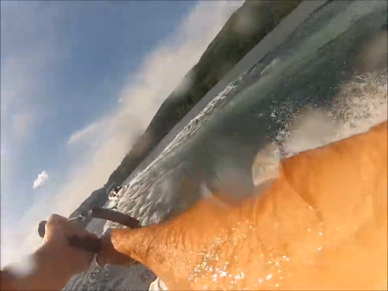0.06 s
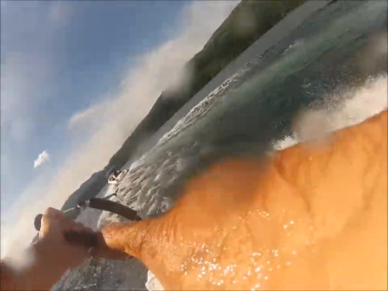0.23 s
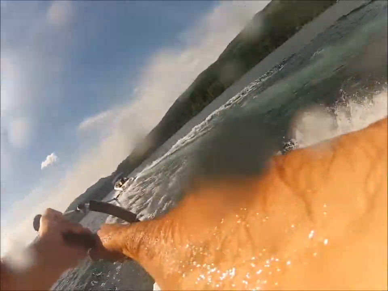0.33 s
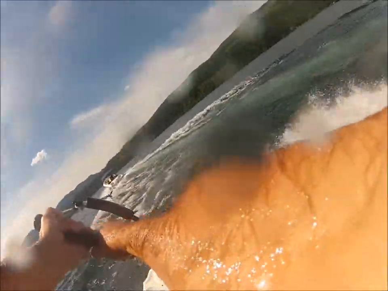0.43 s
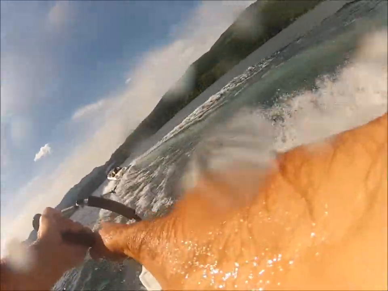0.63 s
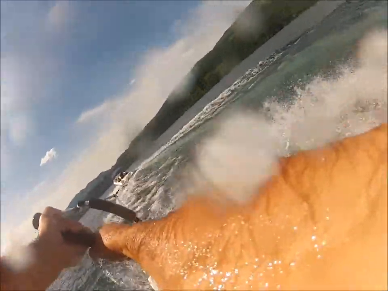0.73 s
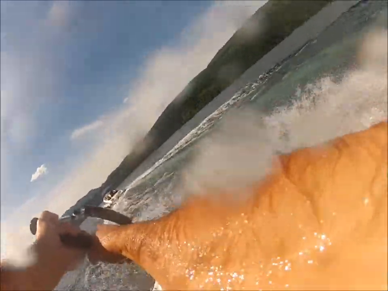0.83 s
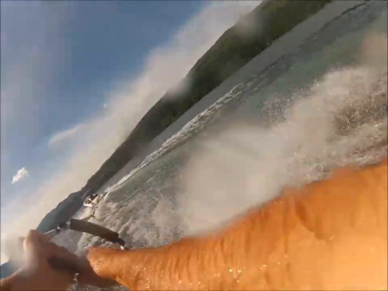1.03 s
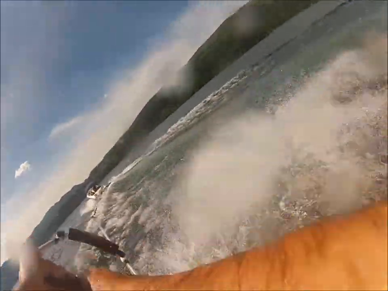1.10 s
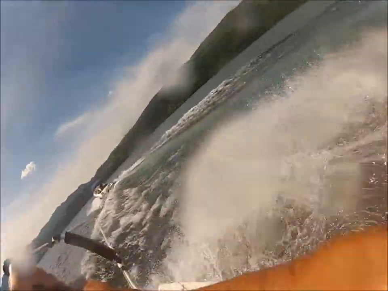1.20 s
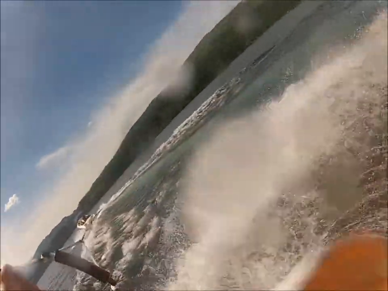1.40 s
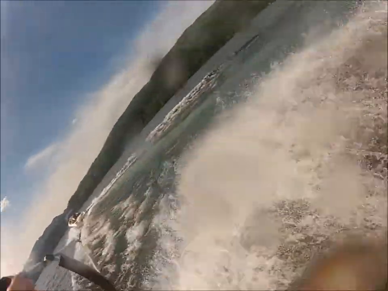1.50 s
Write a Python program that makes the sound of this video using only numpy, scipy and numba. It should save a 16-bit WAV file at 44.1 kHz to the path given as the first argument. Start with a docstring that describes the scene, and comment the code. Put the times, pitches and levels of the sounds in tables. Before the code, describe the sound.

Water slapping sharply on a waterproof camera, with rushing spray, wind and a towing boat's engine.

```python
"""A tow boat's drone, a hissing wake and buffeting wind, broken by sharp cracks and thumps of water.
A wakeboarder crosses a lake, heard from a camera in a waterproof case on the rider. Exhaust pulses
make the drone; drops set the case ringing, slaps push on the microphone, spray and gurgles wash over it.
The camera ducks after loud hits, overloads, and holds its samples at a low rate,
which mirrors the sound into a gritty treble."""
import sys
import numpy as np
from scipy import signal
from scipy.fft import rfft, irfft
from scipy.io import wavfile
from scipy.ndimage import uniform_filter1d, map_coordinates
from numba import njit

SR = 44100
rng = np.random.default_rng(int(sys.argv[2]) if len(sys.argv) > 2 else 0)


def store_wav(level_fs):
    """Save 16-bit WAV to argv[1]."""
    pcm = np.round(np.clip(np.atleast_2d(level_fs), -1, 1) * 32767)
    wavfile.write(sys.argv[1], SR, pcm.T.astype(np.int16))


N = 68355


def drops():
    """Impact excitation: each drop drives two case modes and a splatter, which decay after contact."""
    # impacts: t/s, level/dB, contact/s, main mode f/Hz, lower mode f/Hz,
    # then relative level/dB of the lower mode, the splatter and the knock
    impacts = [(0.046, -37, 0.0031, 3360, 2400, -9, -1, -22),
               (.2336, -11, 0.00098, 1010, 810, -11, -6.5, -11),
               (0.24, -9.5, 0.00095, 2470, 1970, -8, 0.5, 3.5),
               (0.392, -27.5, 0.0017, 950, 650, 0, -19, -8),
               (.4317, -4.5, 0.0011, 2094, 1182, -8, -6.5, -20),
               (0.996, -37.5, 0.0072, 2450, 1123, 3, 4.5, -17),
               (1.0225, -2.5, 0.0024, 2489, 1950, -11, -10, -13),
               (1.0805, -15.5, 0.00053, 2250, 1480, -2, -6, -11),
               (1.2268, -2.5, 0.0041, 2360, 1627, -4, -8.5, -8), (1.287, -33, 0.0024, 1680, 950, 0, -21, 0),
               (1.301, -24, 0.00046, 1900, 1530, -14, -17, -19),
               (1.526, -27, 0.0019, 2240, 1455, 1, -0.5, -2)]
    # spectrum of a large drop splattering on the case: f/Hz, level/dB
    splatter_spectrum = [(100, 9.5), (300, 3), (600, -16), (900, 11.5), (1120, 4), (1300, -28), (1550, 6.5),
                         (1900, 4), (2450, 8.5), (2850, 0), (3150, -19), (3550, 15), (3900, -17)]
    attack_s, decay_s, tail_s, tail_share = 0.00017, 0.00075, 0.0024, undb(-5.5)
    knock_s, push_s = 0.00039, 0.0015
    out = np.zeros(N)
    for at, db, contact, main_hz, low_hz, low_db, splatter_db, knock_db in impacts:
        age = seconds() - at
        after = np.maximum(age - contact, 0)
        decay = (1 - tail_share) * np.exp(-after / decay_s) + tail_share * np.exp(-after / tail_s)
        envelope = np.clip(age / attack_s, 0, 1) * decay
        wobble = 1 + 0.13 * walk(2500)  # frequency modulation broadens the modes into a rattle
        phase_per_hz = 2 * np.pi * np.cumsum((age > 0) * wobble) / SR
        modes = np.sin(main_hz * phase_per_hz) + undb(low_db) * np.sin(low_hz * phase_per_hz)
        splatter = colour(rng.standard_normal(N), splatter_spectrum)
        crack = undb(-2) * burst(modes, envelope) + undb(splatter_db) * burst(splatter, envelope)
        knock = undb(knock_db) * bump(at + contact, knock_s)
        push = undb(-15.5) * bump(at + contact + 2 * push_s, push_s)
        out += undb(db) * (crack - knock + push)
    return out


def slaps():
    """Damped oscillator: water sucks, then pushes on the microphone, which swings back slowly."""
    # driving pulses: t/s, level/dB, half width/s, ratio of suction to push
    pulses = [(0.2397, 4, 0.0052, 1.155), (0.271, -5.5, 0.0016, 0), (0.3936, -11, 0.0012, 0.14),
              (.9988, -23, 0.0013, 0.045), (1.007, -21.5, 0.0021, 1.4), (1.089, -25, .0016, 0)]
    suction_lead_s, suction_s = 0.00488, 0.0014
    swing_hz, swing_q = 33.7, 1.1
    pressure = np.zeros(N)
    for at, db, width, suction in pulses:
        pressure += undb(db) * (bump(at, width) - suction * bump(at - suction_lead_s, suction_s))
    omega = 2 * np.pi * swing_hz
    resonant_highpass = signal.bilinear([1, 0, 0], [1, omega / swing_q, omega ** 2], SR)
    return signal.lfilter(*resonant_highpass, pressure)


def wind(gust_db=1.8, gusts_per_s=18):
    """Turbulence: low pressure noise buffets the case in quick gusts."""
    # spectral density: f/Hz, level/dB
    spectrum = [(15, 7.5), (35, 2.5), (70, 1), (120, -3), (175, -2.5), (260, -9), (420, -13), (620, -26.5),
                (1200, -59)]
    # wind strength: t/s, level/dB
    level = [(0, -36.5), (.07, -36), (.17, -40), (.35, -38), (.6, -39.5), (.75, -37.5), (.9, -36.5),
             (1.1, -35), (1.17, -32.5), (1.3, -39), (1.43, -33.5), (1.55, -33.5)]
    return colour(rng.standard_normal(N), spectrum) * undb(curve(level) + gust_db * walk(gusts_per_s))


def engine(jitter_s=0.00007, scatter_db=1.35):
    """Source and filter: the tow boat's uneven exhaust pulses, dulled by distance and water."""
    # firing rate: t/s, f/Hz
    firing_rate = [(0, 100.2), (.3, 99.6), (.8, 100), (1.17, 98.3), (1.35, 98.8), (1.55, 102)]
    # the four pulses of an engine cycle: relative level/dB
    cylinders = [10, 9.5, 5, 2.5]
    # exhaust response: f/Hz, level/dB
    exhaust = [(40, -2), (100, -3), (200, 1), (300, 0), (400, -5), (470, 3), (520, -34), (600, -38),
               (900, -49), (1500, -66)]
    # drone strength: t/s, level/dB
    level = [(0, -40), (.7, -38), (1.15, -41), (1.55, -43)]
    pulse_count = np.floor(np.cumsum(curve(firing_rate)) / SR + 1 / 4)
    fired = np.flatnonzero(np.diff(pulse_count) > 0)
    late, size = rng.standard_normal((N // 100, 2))[:len(fired)].T
    onsets = np.clip(fired + (late * jitter_s * SR).astype(int), 0, N - 1)
    pulses = np.zeros(N)
    pulses[onsets] = undb(np.resize(cylinders, len(fired)) + scatter_db * size)
    return colour(pulses - pulses.mean(), exhaust) * undb(curve(level))


def wake(flicker_db=0.28):
    """Resonant transmission: the noise of rushing water is coloured by the modes of the case."""
    # spectral density inside the case: f/Hz, level/dB
    spectrum = [(320, -49), (550, -11), (587, -15), (606, -44), (673, -22), (712, -8.5), (760, -8.5),
                (851, -4.5), (923, -6), (1020, -0.5), (1140, 1.5), (1410, -9.5), (1730, -4), (1930, -7.5),
                (2500, 1), (2730, -21.5), (3290, -5.5), (3530, -7.5), (3800, -7.5), (4940, -44),
                (8360, -120)]
    # hiss strength: t/s, level/dB
    level = [(0, -44.5), (.04, -41), (.16, -41.5), (.3, -40.5), (.55, -45), (.65, -43), (.77, -44),
             (1, -41.5), (1.55, -43)]
    return colour(rng.standard_normal(N), spectrum) * undb(curve(level) + flicker_db * walk(45.08))


def spray(droplets_per_s=1700, scatter_db=7):
    """Shot noise: tiny droplets strike the case, louder as the board throws up a sheet of water."""
    # response of the case to fine spray: f/Hz, level/dB
    case_response = [(150, -14), (600, -12), (880, -3), (1200, -20), (1550, -2.5), (2000, -6), (2450, -0.5),
                     (2900, -5.5), (3200, -14), (3550, 2.5), (3900, -44)]
    # spray reaching the case: t/s, level/dB
    level = [(0, -62), (.6, -45.5), (.95, -56), (1.1, -54), (1.35, -48.5), (1.47, -47.5), (1.52, -40),
             (1.55, -39.5)]
    arrivals = rng.random(N) < droplets_per_s / SR
    hits = arrivals * rng.choice([-1, 1], N) * undb(scatter_db * rng.standard_normal(N))
    return colour(hits, case_response) * undb(curve(level))


def gurgles(centre_hz=860, width_hz=87, rise_s=0.0048):
    """Narrow-band resonance: short hollow swells of noise as water runs over the case."""
    # swells: t/s, level/dB
    swells = [(0.263, -36), (0.821, -40), (1.096, -37), (1.128, -42), (1.246, -37.5), (1.282, -37)]
    resonance = signal.iirpeak(centre_hz, centre_hz / width_hz, SR)
    hollow = signal.filtfilt(*resonance, rng.standard_normal(N))
    out = np.zeros(N)
    for at, db in swells:
        age = np.maximum(seconds() - at, 0) / rise_s
        out += undb(db) * burst(hollow, age * np.exp(1 - age))
    return out


def undb(db):
    """Amplitude ratio of a level in decibels."""
    return 10 ** (np.asarray(db) / 20)


def unit(x):
    """Normalisation to rms 1."""
    return x / np.sqrt(np.mean(x ** 2))


def seconds():
    """Time axis, t/s."""
    return np.arange(N) / SR


def curve(rows):
    """Linear interpolation of (t/s, value) rows."""
    return np.interp(seconds(), *np.array(rows).T)


def colour(x, points):
    """Spectral shaping by (f/Hz, level/dB) points; rms 1."""
    hz, db = np.array(points).T
    f = np.maximum(np.fft.rfftfreq(2 * N, 1 / SR), 1)
    gain = undb(np.interp(np.log(f), np.log(hz), db))
    return unit(irfft(rfft(x, 2 * N) * gain)[:N])


def walk(rate):
    """Random modulation: values held for 1 / rate seconds and smoothed twice; rms 1."""
    hold = int(SR / rate)
    steps = rng.standard_normal(N)[np.arange(N) // hold]
    return unit(uniform_filter1d(uniform_filter1d(steps, hold), hold))


def burst(carrier, envelope):
    """Amplitude modulation, scaled to the energy of the envelope."""
    shaped = carrier * envelope
    return shaped * np.sqrt(np.sum(envelope ** 2) / np.sum(shaped ** 2))


def bump(at, width):
    """Gaussian pressure pulse."""
    return np.exp(-((seconds() - at) / width) ** 2)


@njit
def follow(x, attack_s, release_s):
    """Envelope detection: rectify, then smooth with separate time constants for rise and fall."""
    out, level = np.empty(len(x)), 0.
    for i in range(len(x)):
        lag_s = attack_s if abs(x[i]) > level else release_s
        level += (abs(x[i]) - level) / (lag_s * SR)
        out[i] = level
    return out


def scene():
    """Superposition of all sources at one microphone."""
    return (engine() + wake() + spray() + wind() + drops() + slaps() + gurgles())[None]


def record(dry):
    """Gain control ducks loud hits; a zero-order hold mirrors the spectrum upward; peaks clip."""
    sense_above_hz, threshold_db = 190, -14
    band_hz, hold_hz, top_hz, clip_level = 3950, 8000, 15500, 0.88
    sensed = signal.sosfilt(signal.butter(1, sense_above_hz, "high", fs=SR, output="sos"), dry[0])
    level = follow(sensed, attack_s=0.0051, release_s=0.067)
    ducked = dry[0] / np.maximum(level / undb(threshold_db), 1)
    narrow = signal.sosfiltfilt(signal.butter(14, band_hz, fs=SR, output="sos"), ducked)
    fine_s = np.arange(4 * N) / (4 * SR)  # fourfold oversampling
    sampled_s = (np.floor(fine_s * hold_hz) + .5) / hold_hz
    steps = map_coordinates(narrow, [sampled_s * SR], mode="nearest")
    held = signal.resample_poly(np.clip(steps, -clip_level, clip_level), 1, 4)
    top_cut = signal.ellip(8, .1, 50, top_hz, fs=SR, output="sos")
    return signal.sosfiltfilt(top_cut, held)[None]


dry = scene()
out = record(dry)
store_wav(out)
```